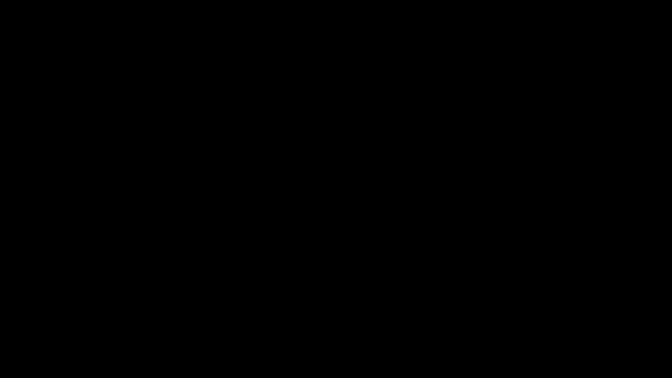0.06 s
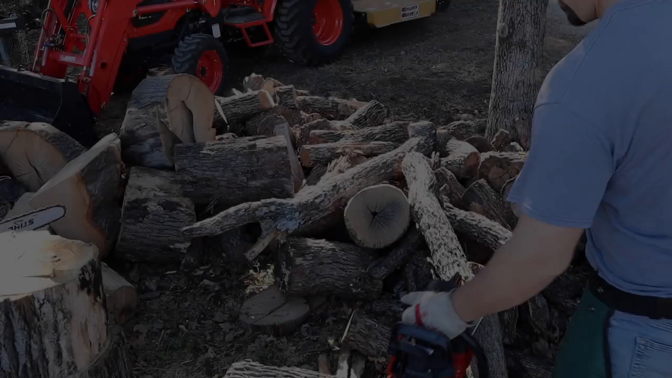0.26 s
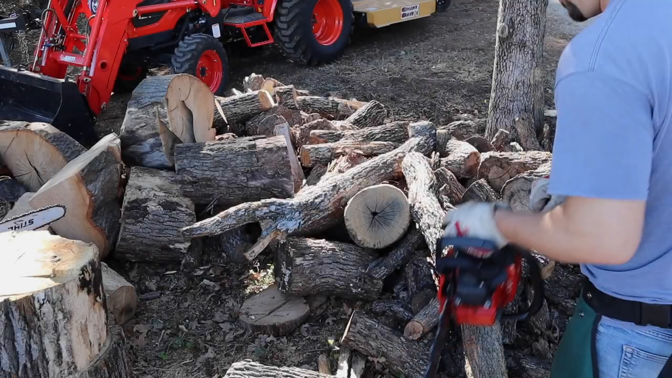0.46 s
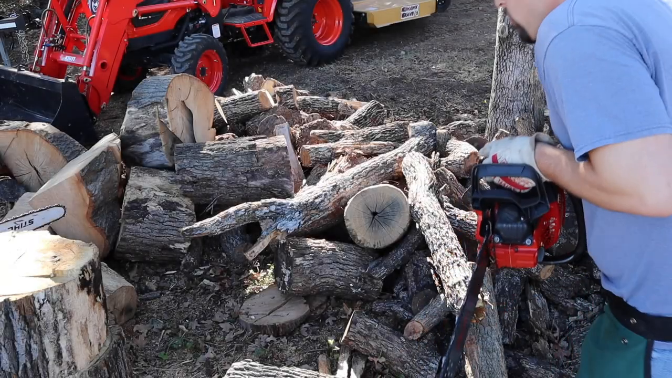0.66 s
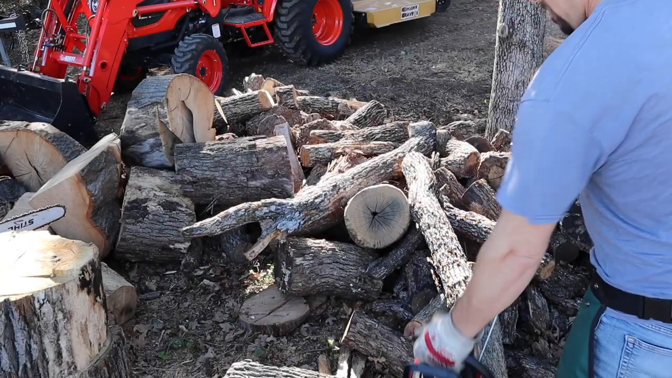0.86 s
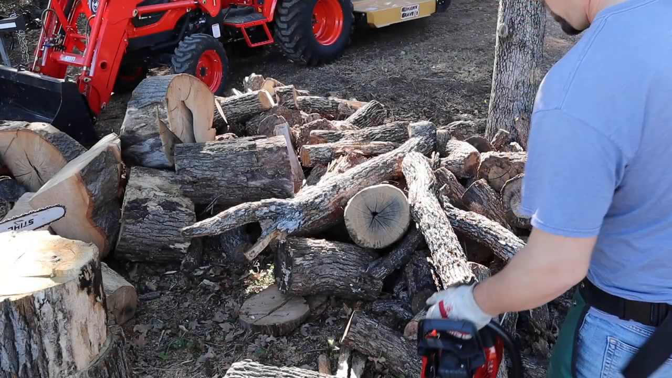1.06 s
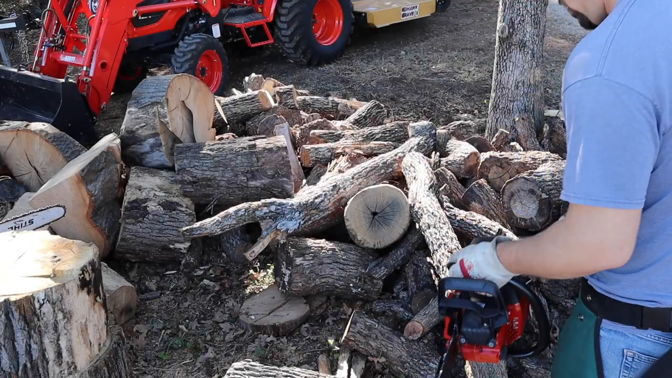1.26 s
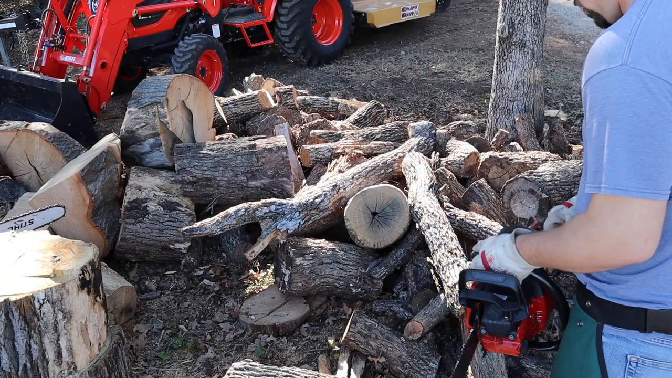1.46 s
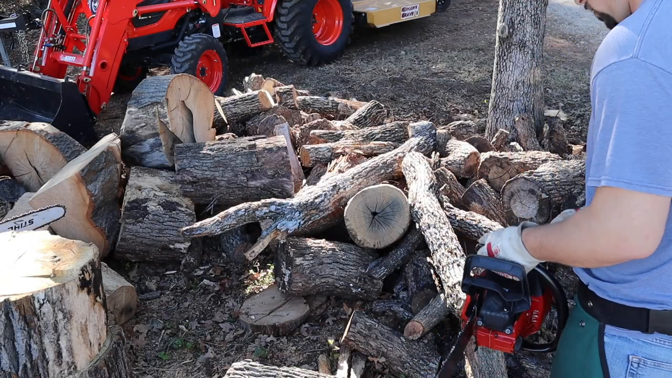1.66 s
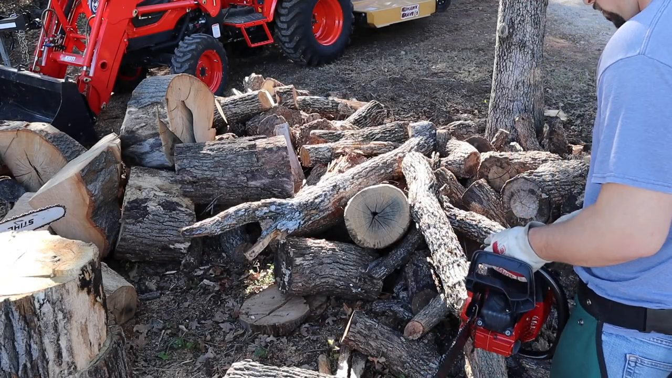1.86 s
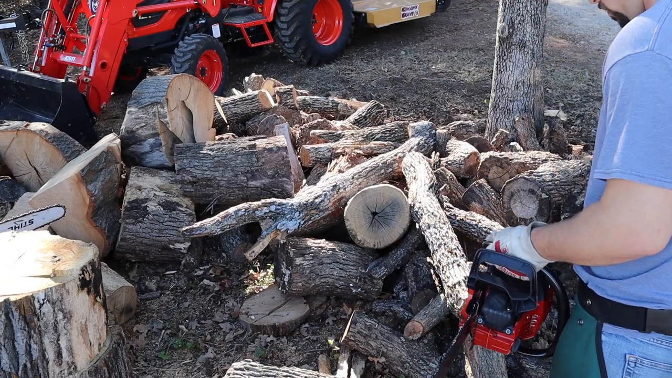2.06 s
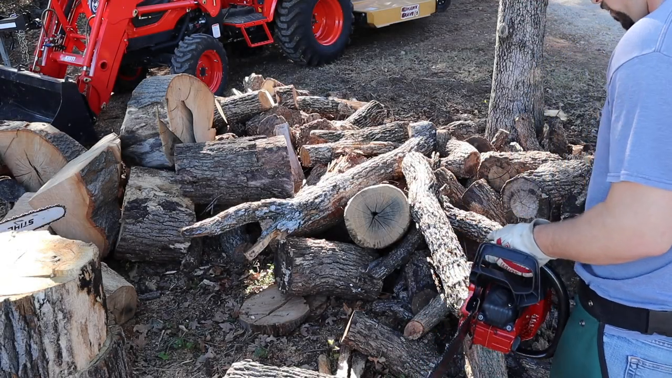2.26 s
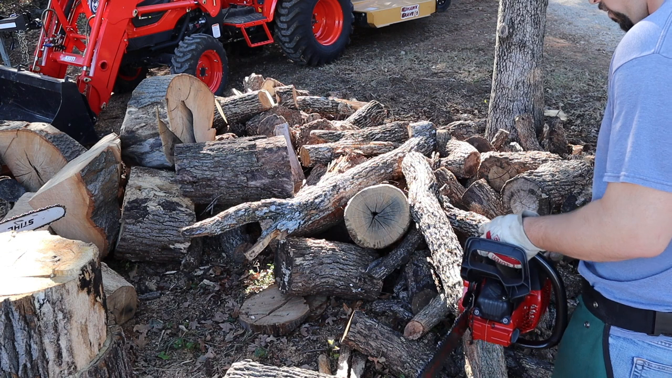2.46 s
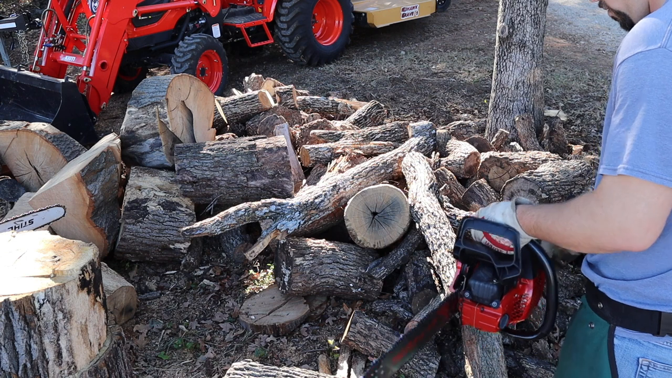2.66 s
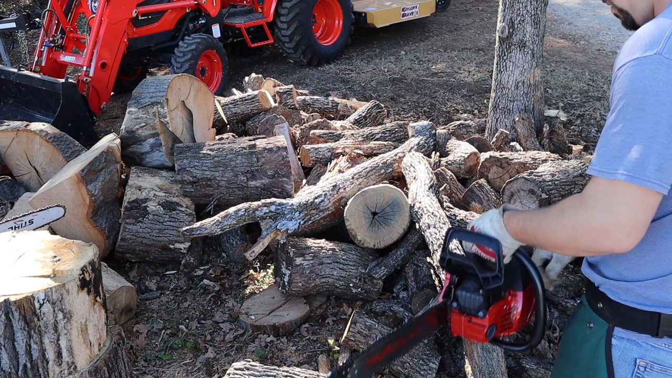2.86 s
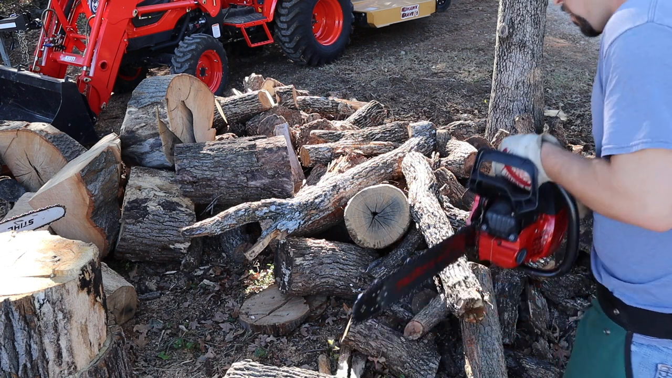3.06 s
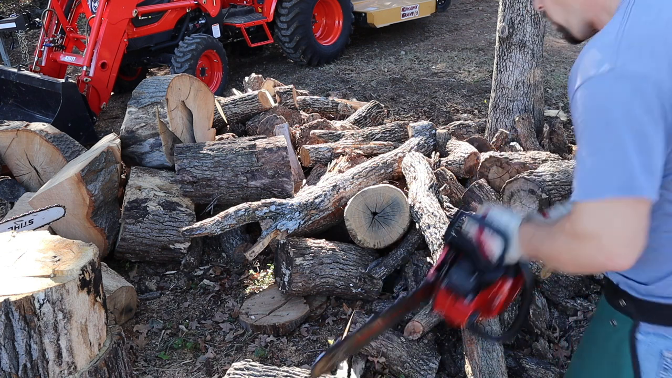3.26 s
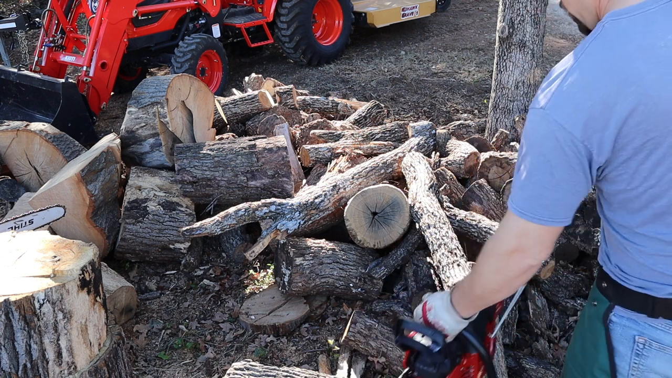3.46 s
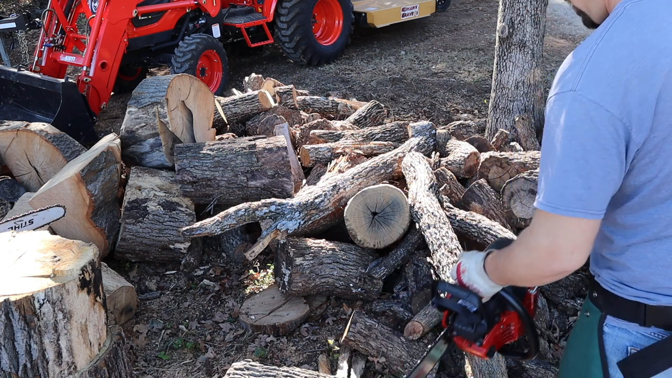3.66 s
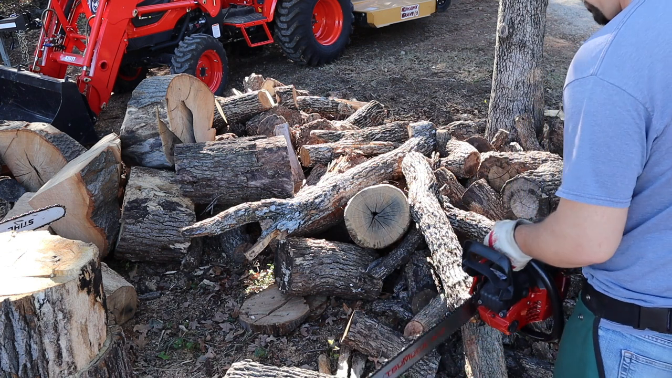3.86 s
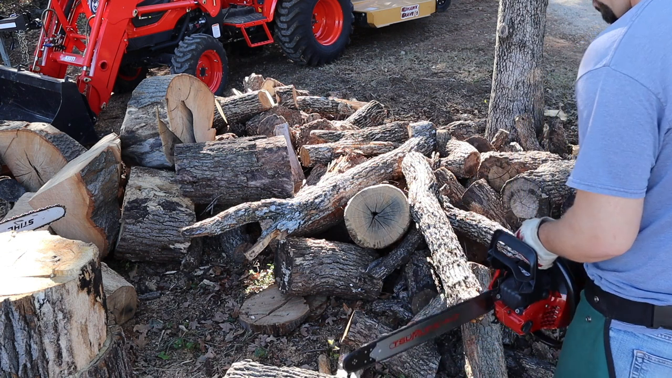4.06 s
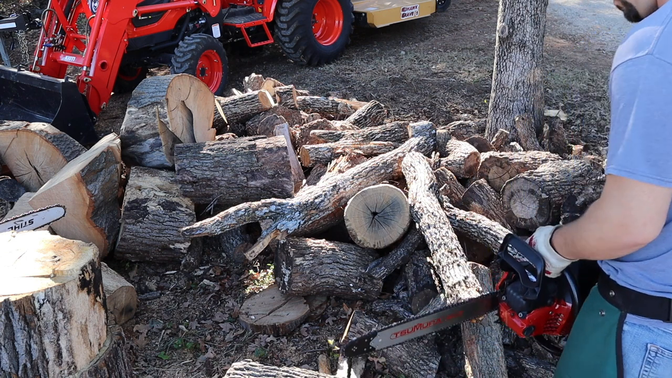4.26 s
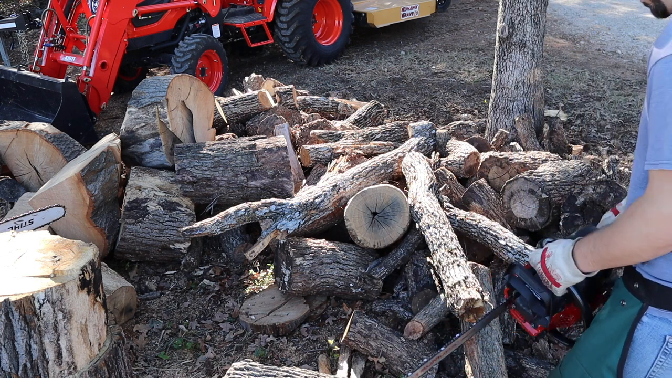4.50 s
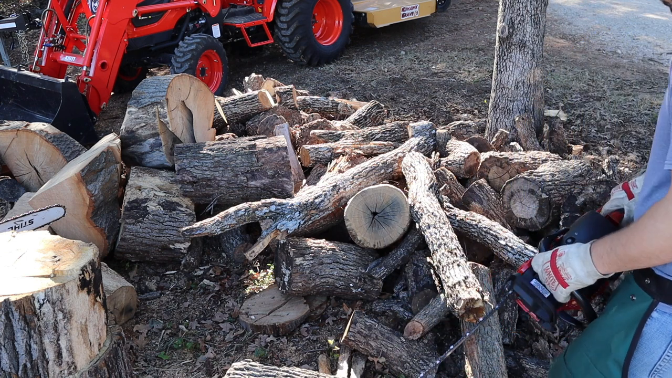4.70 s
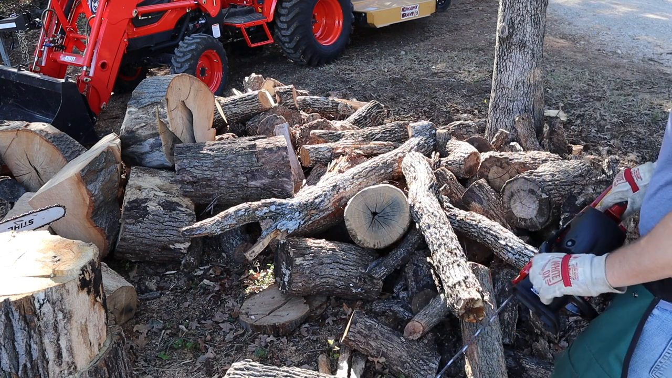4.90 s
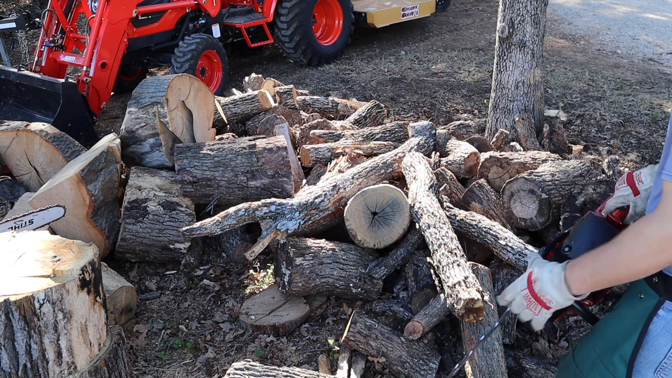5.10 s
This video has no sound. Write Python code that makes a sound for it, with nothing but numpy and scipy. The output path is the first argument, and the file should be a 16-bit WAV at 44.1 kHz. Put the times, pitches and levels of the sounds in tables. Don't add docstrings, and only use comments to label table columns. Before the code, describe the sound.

Close outdoor pickup of a small chainsaw. Plastic knocks and body thumps open it, with a first rope pull, whirring and clinking as it rewinds. A second pull gives three sharp coughs and dies. A switch clicks, near silence with faint glove taps follows, then a third pull catches and the engine idles loudly with irregular pops to the end.

```python
import sys
import numpy as np
from scipy import signal
from scipy.fft import rfft, irfft
from scipy.io import wavfile
from scipy.ndimage import uniform_filter1d

SR = 44100
rng = np.random.default_rng(int(sys.argv[2]) if len(sys.argv) > 2 else 0)


def to_linear_factor(level_db):
    exponent = np.asarray(level_db, float) / 20
    return 10 ** exponent


def materialize(psi):
    bounded = np.clip(np.atleast_2d(psi).T, -1, 1)
    quanta = np.round(bounded * 32767).astype(np.int16)
    wavfile.write(sys.argv[1], SR, quanta)


N = 226497
T = np.arange(N) / SR
IDLE_TURNS = 75

# start_s, crack_peak_db, bark_db
FIRING_TIMES = [(3.4491, 0, -13), (3.516, -4, -14.5), (3.5973, -3.5, -12), (3.6729, -2.5, -11.5),
                (3.744, -4, -12), (3.8132, -2, -10.5), (3.8641, -6.5, -13), (3.9055, -7, -12),
                (3.972, -3.5, -11.5), (4.0378, -5.5, -12), (4.106, -1, -14.5), (4.1725, -2.5, -13.5),
                (4.2232, -2, -14.5), (4.2506, -6, -15), (4.3046, -1.5, -16), (4.3591, -4, -16),
                (4.4135, -5, -15.5), (4.4807, -3.5, -15.5), (4.5352, -4, -15.5), (4.6054, -7, -16),
                (4.6473, -13, -17.5), (4.6887, -21, -16), (4.7261, -11.5, -14), (4.8084, -9.5, -13.5),
                (4.8604, -11.5, -14), (4.9115, -8, -15.5), (4.9781, -8, -13), (5.0184, -12.5, -13),
                (5.0707, -9.5, -13.5), (5.1233, -9.5, -13.5)]
# pitch_hz, level_db (per Hz)
HISS_COLOUR = [(1350, -47), (2300, -9), (2600, -29), (3520, 14.5), (3890, 6.5), (4780, 14.5), (6310, 8),
               (7810, 8), (11000, -41), (12900, -14.5), (14600, -27), (15600, -12.5), (16400, -42.5)]
# pitch_hz, level_db (per Hz)
CRACK_COLOUR = [(1410, -34.5), (2400, -22.5), (3030, -18.5), (4180, -3), (5230, -10.5), (6000, -6.5),
                (6660, -1), (7570, -0.5), (8960, -5), (10900, -15.5), (13800, -9), (15700, -31),
                (16400, -32)]
# pitch_hz, level_db (per Hz)
SCRAPE_COLOUR = [(290, -51.5), (500, -8), (993, -9.5), (1560, -5.5), (2220, -13.5), (5090, -15),
                 (5980, -21), (8730, -21.5), (14100, -41.5), (16400, -45)]
# pitch_hz, level_db, t60_s
PAWL_PARTIALS = [(3865, 0, .045), (3925, -3, .03), (7230, -14, .04), (9380, -13, .05), (10300, -18, .04),
                 (10900, -18, .035), (13100, -14, .045), (13730, -11, .035), (14700, -18, .035)]


def evened(x):
    return x / np.sqrt(np.mean(x ** 2) + 1e-20)


def drift(count, size):
    return evened(uniform_filter1d(rng.standard_normal(count), size=size))


def coloured(points, count):
    f, db = np.transpose(points)
    hz = np.fft.rfftfreq(count, 1 / SR)
    gain = to_linear_factor(np.interp(np.log(hz + 1), np.log(f), db))
    return evened(irfft(rfft(rng.standard_normal(count)) * gain, count))


def highpass(x, order, hz):
    return signal.sosfilt(signal.butter(order, hz, "high", fs=SR, output="sos"), x)


def resonate(x, hz, width):
    turn = np.exp(2j * np.pi * np.cumsum(hz * np.ones(len(x))) / SR)
    r = np.exp(-np.pi * width / SR)
    return 2 * (turn * signal.lfilter([1 - r], [1, -r], x / turn)).real


def cavity(x, modes):
    out = np.zeros(len(x))
    for hz, width, db in modes:
        r = np.exp(-np.pi * width / SR)
        pole = r * np.exp(2j * np.pi * hz / SR)
        out += to_linear_factor(db) * 2 * signal.lfilter([1 - r], [1, -pole], x).real
    return out


def ring(modes, spread_db):
    t = np.arange(6000) / SR
    shake = 1 + 0.36 * drift(len(t), 160)
    out = np.zeros(len(t))
    for hz, db, t60 in modes:
        level_db = db + spread_db * rng.standard_normal()
        out += to_linear_factor(level_db - 60 * t / t60) * np.sin(2 * np.pi * hz * t)
    return shake * out


def add(mix, s, sound):
    part = mix[round(s * SR):][:len(sound)]
    part += sound[:len(part)]


def still_air():
    # pitch_hz, level_db (per Hz)
    air_colour = [(12, -16), (20, -11.5), (81, 0.5), (139, -12.5), (230, -9.5), (350, -17), (490, -17),
                  (533, -20), (649, -17), (706, -17.5), (16400, -46.5)]
    return to_linear_factor(-64) * to_linear_factor(drift(N, 2500)) * coloured(air_colour, N)


def bird():
    # start_s, level_db, pitch_hz, length_s
    bird_notes = [(2.31, -73, 4300, 0.044), (2.44, -75, 4250, .045)]
    out = np.zeros(N)
    for s, db, hz, length in bird_notes:
        t = np.arange(0, length, 1 / SR)
        warble = 1.13 * np.sin(2 * np.pi * 45 * t)
        add(out, s, to_linear_factor(db) * np.sin(2 * np.pi * hz * t + warble) * np.hanning(len(t)))
    return out


def yard(x):
    t = np.arange(12000) / SR
    sparse = rng.random(len(t)) < .05
    echoes = rng.standard_normal(len(t)) * sparse * to_linear_factor(-60 * t / 0.15) * (t > .006)
    echoes = signal.lfilter([1], [1, -.5], echoes)
    return signal.oaconvolve(x, echoes / np.linalg.norm(echoes))[:N]


def rustling():
    # start_s, length_s, level_db
    cloth_rubs = [(0, 0.073, -50), (0.683, 0.43, -64), (1.638, 0.2, -71.5), (2.0, 0.33, -80),
                  (2.459, 0.43, -71), (3.178, 0.21, -78)]
    rubs = np.zeros(N)
    for s, length, db in cloth_rubs:
        add(rubs, s, to_linear_factor(db) * np.sqrt(np.hanning(round(length * SR))))
    grains = to_linear_factor(1.5 * drift(N, 200))
    return rubs * grains * coloured(SCRAPE_COLOUR, N)


def jolting():
    # start_s, level_db
    body_jolts = [(0.001, -43), (0.024, -28), (.14, -29.5), (.44, -51.5), (.56, -59.5), (1.4, -48.5),
                  (1.428, -54.5)]
    # pitch_hz, width_hz, level_db
    body_modes = [(85.4, 30, 1), (172, 55, 0.5), (372.7, 84, -4.5)]
    rise_s, t60_s = 0.0046, 0.4
    jolts, t = np.zeros(N), np.arange(SR // 2) / SR
    for s, db in body_jolts:
        add(jolts, s, np.minimum(t / rise_s, 1) * to_linear_factor(db - 60 * t / t60_s))
    return jolts * evened(cavity(rng.standard_normal(N), body_modes))


def knocking():
    # start_s, peak_db, pitch_hz, bright_db, t60_s
    plastic_knocks = [(0.023, -15.5, 449, -38, 0.072), (0.102, -8, 870, -63, 0.018),
                      (0.376, -20.5, 1845, -38, 0.12), (0.593, -37, 1990, -50.5, 0.031),
                      (0.857, -35, 700, -20, 0.059), (0.862, -18, 1880, -40, 0.022),
                      (1.468, -38, 834, -43, 0.035), (1.56, -34.5, 666, -45, 0.036),
                      (1.604, -16, 944, -25, 0.029), (3.343, -32, 584, -58, 0.033),
                      (3.362, -21, 492, -58, 0.078)]
    # start_s, peak_db, pitch_hz
    faint_knocks = [(1.745, -60, 790), (1.794, -58, 1086), (2.073, -57, 1047), (2.124, -55, 720),
                    (2.163, -48.5, 1193), (2.175, -39.5, 1310), (2.237, -60.5, 793), (2.552, -58, 1820),
                    (2.574, -57, 515), (2.609, -51.5, 1037), (2.645, -57.5, 757), (2.734, -59, 680),
                    (2.781, -51.5, 642), (2.913, -61, 637), (3.31, -45.5, 714), (3.328, -46, 1320),
                    (3.334, -40, 1470)]
    # pitch_factor, level_db
    shell_partials = [(0.998, 6), (1.222, -1), (1.552, 1.5), (2.098, -12.5)]
    tap_bright_db, tap_t60_s = -9.5, 0.045
    taps = [(s, db, hz, db + tap_bright_db, tap_t60_s) for s, db, hz in faint_knocks]
    out, t = np.zeros(N), np.arange(6000) / SR
    for s, peak_db, hz, bright_db, t60 in plastic_knocks + taps:
        shell = ring([(hz * k, db, t60) for k, db in shell_partials], 3)
        shell *= 1 - np.exp(-t / .0005)
        loose_parts = evened(cavity(rng.standard_normal(len(t)), [(1.3 * hz, hz, 0)]))
        shell += 0.31 * loose_parts * to_linear_factor(-60 * t / (2.2 * t60))
        scrape = coloured(SCRAPE_COLOUR, len(t)) * to_linear_factor(-60 * t / (0.88 * t60))
        add(out, s, to_linear_factor(peak_db) * shell / abs(shell).max() + to_linear_factor(bright_db + 6.5) * scrape)
    return highpass(out, 4, 330)


def rewinds():
    # (first_click_db, fade_db_per_s, reel_hiss_db), click moments_s
    rope_returns = [
        ((-8.5, -103, -39), [.379, .3928, .4076, .423, .439, .4718, .4944, .5206, .5466]),
        ((-14.5, -140, -69), [1.385, 1.3906, 1.4313, 1.4537, 1.474]),
    ]
    skip_low_db, reel_s = -15, .1
    rows, reel = [], np.zeros(N)
    t = np.arange(0, reel_s, 1 / SR)
    for (first_db, fade_db, hiss_db), moments in rope_returns:
        for s in moments:
            click_db = first_db + fade_db * (s - moments[0])
            rows.append((s, click_db, skip_low_db + click_db))
        add(reel, moments[0], to_linear_factor(hiss_db + fade_db * t) * coloured(HISS_COLOUR, len(t)))
    return rows, reel


def rope():
    # start_s, level_db, centre_hz
    rope_whirs = [
        [(.34, -55, 640), (.4, -34.5, 910), (.45, -35.5, 830), (.6, -67, 610)],
        [(1.35, -69, 1100), (1.39, -54, 1190), (1.5, -65, 790)],
        [(3.28, -64, 700), (3.33, -60.5, 900), (3.36, -52, 2900), (3.38, -30, 4000)],
    ]
    out = np.zeros(N)
    for rows in rope_whirs:
        s, db, hz = np.transpose(rows)
        t = np.arange(s[0], s[-1], 1 / SR)
        whir = resonate(rng.standard_normal(len(t)), np.interp(t, s, hz), .35 * hz.mean())
        whir *= to_linear_factor(4 * drift(len(t), 150))
        add(out, s[0], to_linear_factor(np.interp(t, s, db)) * evened(whir))
    return out


def starter():
    # start_s, peak_db, low_ring_db
    pawl_clinks = [(0.1165, -26, -39), (0.2253, -6, -12.5), (0.2354, -14.5, -38), (0.3246, -19.5, -46.5),
                   (0.3708, -12.5, -23.5), (0.6246, -35.5, -50.5), (.763, -46, -63.5), (.783, -40.5, -70),
                   (1.2805, -17, -25.5), (1.332, -35, -47), (1.375, -19.5, -41)]
    skips, out = rewinds()
    t = np.arange(6000) / SR
    for s, peak_db, low_db in pawl_clinks + skips:
        tick = 0.37 * coloured(CRACK_COLOUR, len(t)) * to_linear_factor(-60 * t / 0.016)
        tick += 0.65 * coloured(SCRAPE_COLOUR, len(t)) * to_linear_factor(-60 * t / .03)
        tick += ring(PAWL_PARTIALS[2:], 1.8)
        low_ring = ring(PAWL_PARTIALS[:2], 2.7) * (1 - np.exp(-t / 0.0015))
        add(out, s, to_linear_factor(peak_db - 9) * tick + to_linear_factor(low_db + 3) * low_ring)
    return out + rope()


def crank_angle():
    # start_s, turns until the next row, slowing (0-1)
    pulled_turns = [(.145, 1, 0), (.1708, 4, .17), (.2775, 2, .02), (.389, 0, 0), (.862, 1, 0),
                    (.8937, 3, 0), (.9436, 8, .2), (1.0993, 5, .18), (1.2098, 4, .42), (1.3944, 0, 0),
                    (3.352, 1, 0), (3.378, 2, 0), (3.427, 1, 0)]
    # start_s, speed (turns a second)
    idle_speed = [
        (3.45, 60),
        (3.75, 72),
        (3.9, 75),
    ]
    fired = np.transpose(FIRING_TIMES)[0]
    turns = np.round(np.diff(fired) * np.interp(fired[:-1], *np.transpose(idle_speed)))
    rows = pulled_turns + list(zip(fired[:-1], turns, turns / 75))
    rows += [(fired[-1], 75, 0), (fired[-1] + 1, 0, 0)]
    s, turns, slowing = np.transpose(rows)
    k = np.clip(np.searchsorted(s, T) - 1, 0, len(s) - 2)
    u = np.maximum(T - s[k], 0) / np.diff(s)[k]
    turns_before = np.cumsum(turns) - turns
    return turns_before[k] + turns[k] * (u + slowing[k] * u * (1 - u)) + 1e-6


def strokes(angle, lag, spread_db):
    turn = np.floor(angle - lag)
    return (np.diff(turn, prepend=turn[0]) > 0) * to_linear_factor(spread_db * rng.standard_normal(N))


def by_speed(angle, idle_db, halving_db):
    keep = np.exp(-1 / (SR * 0.0067))
    speed = signal.lfilter([1 - keep], [1, -keep], np.gradient(angle) * SR / IDLE_TURNS)
    return to_linear_factor(idle_db - halving_db * np.log2(abs(speed) + 1e-9))


def muffler_gulps(angle, fast):
    # pitch_hz, width_hz, level_db
    muffler_modes = [
        (232, 70, 5),
        (285, 90, -1),
        (535, 200, 0),
        (75, 30, 0),
        (725, 150, -1),
    ]
    wobble = .024 * drift(N, 600)
    clicks = strokes(angle, wobble - .035, 1.5)
    clicks -= .6 * fast ** 2 * strokes(angle, wobble - .11, 2)
    intake = signal.oaconvolve(strokes(angle, .5 + wobble, 2.5), signal.windows.hann(40))[:N]
    gulps = -signal.oaconvolve(clicks * fast, signal.windows.hann(44))[:N]
    gulps -= signal.oaconvolve(clicks * abs(1 - fast), signal.windows.hann(80), "same")
    late = np.roll(gulps - 0.1 * intake, round(.0014 * SR))
    body = cavity(late, muffler_modes[:2]) + cavity(gulps - .38 * intake, muffler_modes[2:3])
    outer = fast ** 1.5 * cavity(gulps - .28 * intake, muffler_modes[3:])
    thump = highpass(body, 2, 130) + outer
    return thump / np.sqrt(uniform_filter1d(thump ** 2, size=3000) + 1e-4 * np.max(thump) ** 2)


def port_hiss(opening, puff, fast):
    # start_s, level_db
    cylinder_facing = [(.2, 0.5), (1.0, 0), (1.2, 6), (1.35, -9), (3.4, 0), (3.62, 2.5), (3.95, -2),
                       (4.6, -4), (5.14, -6)]
    slow_strokes = opening * abs(1 - fast) * np.clip(12 * (fast - .27), 0, 1)
    snap = signal.lfilter([1], [1, -np.exp(-1 / (SR * .002))], slow_strokes)
    flutter = to_linear_factor(2.5 * drift(N, 120))
    hiss = (.15 + .4 * fast ** 3 + 1.5 * puff) * flutter * coloured(HISS_COLOUR, N)
    hiss += 4.2 * snap * coloured(CRACK_COLOUR, N)
    return hiss * to_linear_factor(np.interp(T, *np.transpose(cylinder_facing)))


def pumping():
    # pitch_hz, width_hz, level_db
    drone_modes = [(520, 200, -3), (720, 200, -2), (950, 200, -6), (1520, 200, -5), (1800, 250, 0),
                   (2000, 200, -2)]
    angle = crank_angle()
    fast = np.clip(uniform_filter1d(np.gradient(angle) * SR, size=2000) / IDLE_TURNS, 0, 1.2)
    opening = strokes(angle, .6 + .12 * fast, 2)
    puff = signal.lfilter([1], [1, -np.exp(-1 / (SR * .005))], opening)
    drone = evened(cavity((1.4 + 0.31 * puff) * rng.standard_normal(N), drone_modes))
    out = by_speed(angle, idle_db=-23.5, halving_db=-5) * muffler_gulps(angle, fast)
    out += by_speed(angle, idle_db=-30, halving_db=-9.5) * drone
    return out + by_speed(angle, idle_db=-34.5, halving_db=-5) * port_hiss(opening, puff, fast)


def firing(crack_db, bark_db, ring_db):
    # pitch_hz, width_hz, level_db
    outlet_modes = [(72.5, 29, 4), (246, 55, 6), (498.4, 180, -8), (700, 290, 11.5), (860, 650, -22),
                    (1600, 210, 10.5), (1790, 37, 16.5), (1990, 160, -4.5)]
    # pitch_hz, level_db, t60_s
    fin_partials = [(6650, -2, .016), (8085, 0, .03), (8900, 0, .018)]
    t = np.arange(5000) / SR - .004
    u, on = np.maximum(t, 0), t >= 0
    pop = on * (.065 * to_linear_factor(-60 * u / .05) * rng.standard_normal(len(t)) - np.exp(-u / .00006))
    modes = [(hz * (1 + .03 * rng.standard_normal()), width, db + 1.5 * rng.standard_normal())
             for hz, width, db in outlet_modes]
    bark = cavity(pop, modes)
    leak = .2 * to_linear_factor(60 * np.minimum(t, 0) / .025) * ~on
    decay = to_linear_factor(-60 * u / 0.033) + 0.15 * to_linear_factor(-60 * u / 0.064)
    blast = leak + (1 - np.exp(-u / 0.000094)) * decay
    crack = blast * coloured(CRACK_COLOUR, len(t)) * 0.28
    add(crack, .0045, .13 * ring(fin_partials, 4))
    pawls = ring(PAWL_PARTIALS[:2], 0.39) * (1 - np.exp(-np.arange(6000) / 60))
    add(crack, .003, to_linear_factor(ring_db - crack_db - 2) * pawls)
    return to_linear_factor(crack_db) * crack + to_linear_factor(bark_db + 11) * bark / abs(bark).max()


def exhaust():
    # start_s, crack_peak_db, bark_db
    pull_coughs = [
        (0.8929, 2.5, -10.5),
        (0.9433, -1.5, -12.5),
        (1.0989, -3, -14),
    ]
    # start_s, crack_peak_db, bark_db
    late_pops = [(4.6614, -15, -16.5), (4.7379, -31, -22.5), (4.9502, -23, -21)]
    throw_db, rattle_db = -9.5, -24
    out = np.zeros(N)
    opens = T[strokes(crank_angle(), -.02, 0) > 0]
    for rows, thrown in ((pull_coughs, True), (FIRING_TIMES, True), (late_pops, False)):
        for k, (s, *levels) in enumerate(rows):
            ring_db = throw_db if thrown and k == 0 else rattle_db
            nearest = opens[np.argmin(abs(opens - s))]
            add(out, nearest - .004, firing(*levels, ring_db))
    return out


def scene():
    # delay_s, level_db
    ground_bounce = (.0043, -13.5)
    engine = pumping() + exhaust()
    add(engine, ground_bounce[0], to_linear_factor(ground_bounce[1]) * uniform_filter1d(engine, size=3))
    handling = knocking() + jolting() + rustling()
    saw = highpass(engine + starter() + handling, 2, 85)
    return (saw + to_linear_factor(-15.5) * yard(saw) + bird() + still_air())[None]


def top_cut(x):
    return signal.sosfilt(signal.butter(12, 16510, fs=SR, output="sos"), x)


def record(dry):
    lowpass = signal.firwin(255, 16200, window=("kaiser", 8), fs=SR)
    limited = signal.oaconvolve(dry, lowpass[None], "same")
    return top_cut(np.clip(limited, -1, 1))


dry = scene()
out = record(dry)
materialize(out)
```